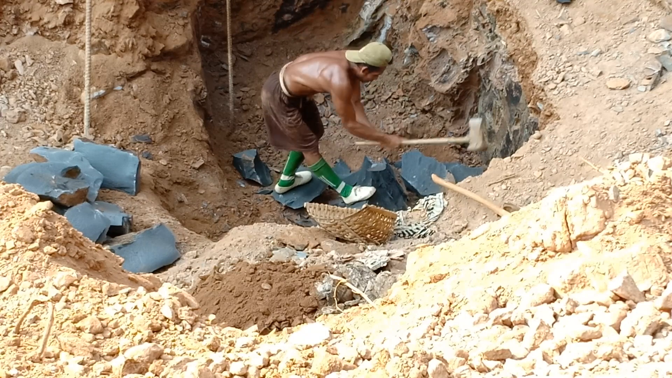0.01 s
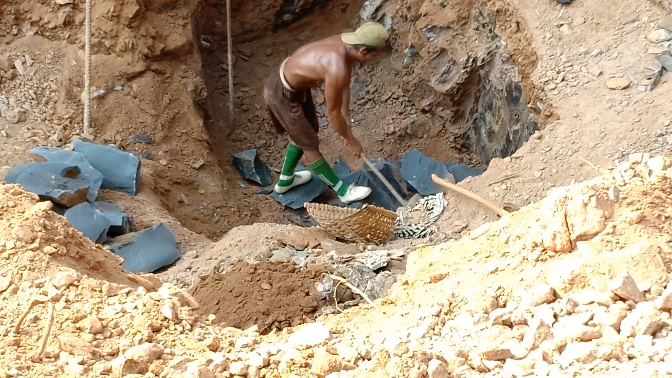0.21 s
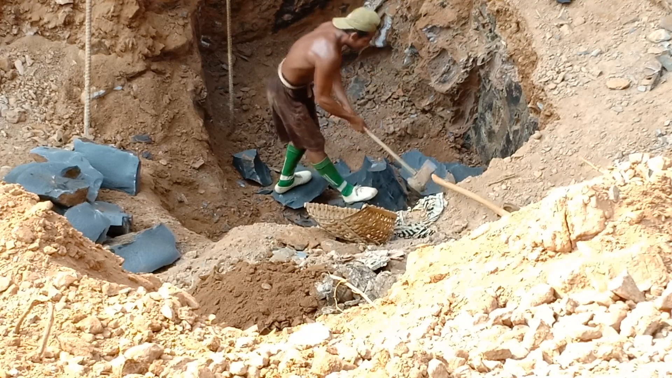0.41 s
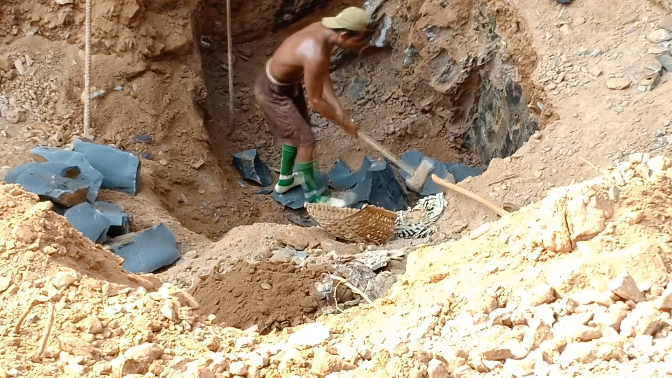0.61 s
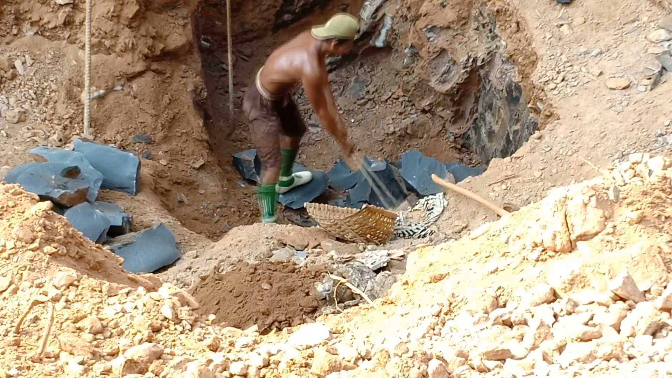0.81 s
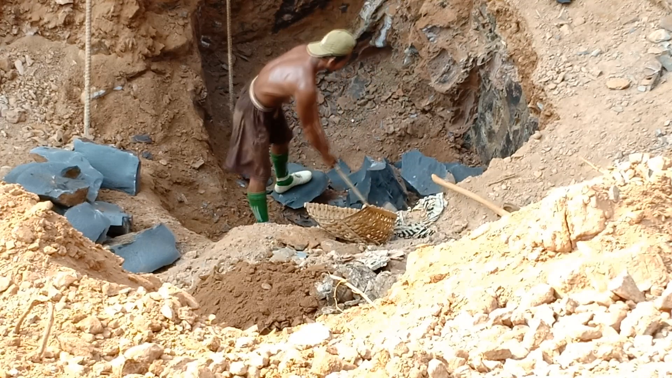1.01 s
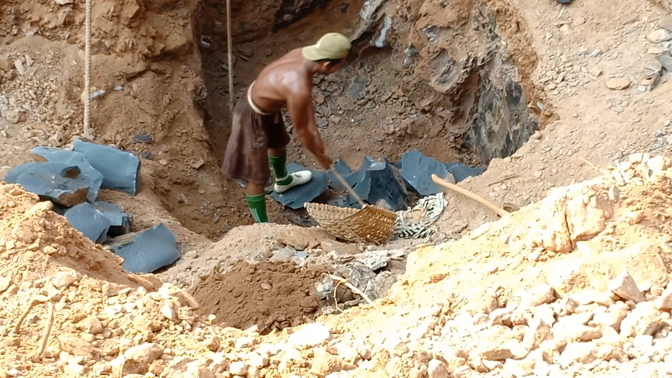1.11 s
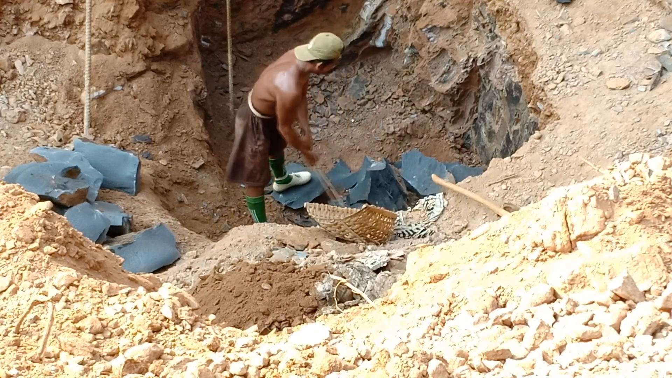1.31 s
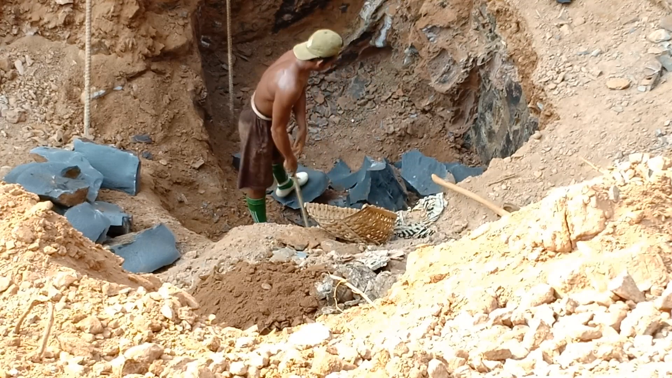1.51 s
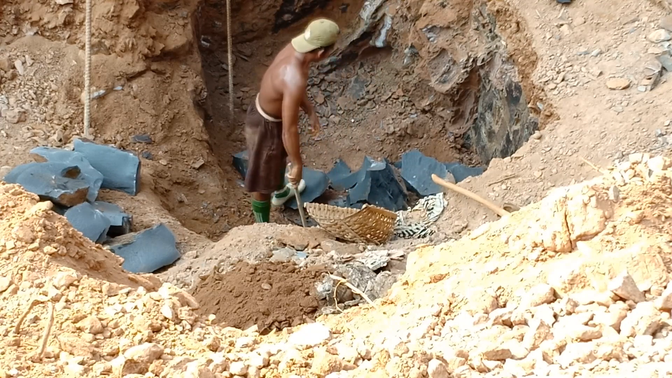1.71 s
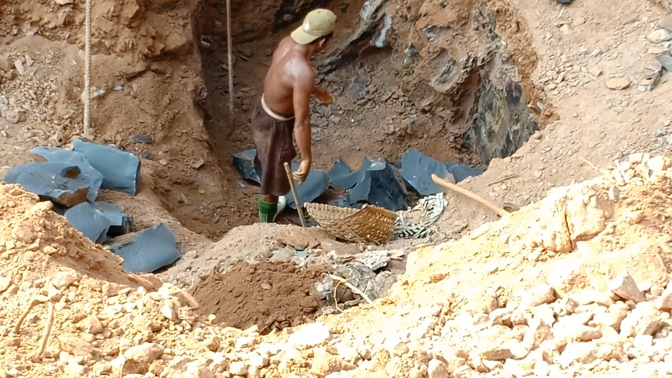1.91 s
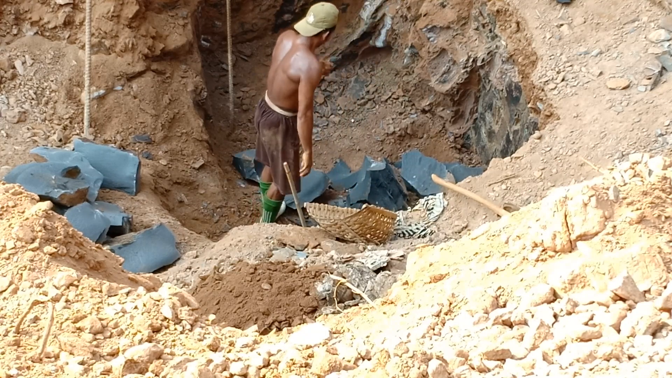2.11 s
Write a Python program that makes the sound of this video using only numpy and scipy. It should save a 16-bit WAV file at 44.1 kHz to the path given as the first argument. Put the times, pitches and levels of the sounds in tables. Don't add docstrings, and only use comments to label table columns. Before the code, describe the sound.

Hammer blow on stone with slumping grit, followed shortly by a rock knock and metallic clink

```python
import sys
import numpy as np
from scipy import signal
from scipy.fft import rfft, irfft, next_fast_len
from scipy.io import wavfile
from scipy.ndimage import map_coordinates

SR = 44100
rng = np.random.default_rng(int(sys.argv[2]) if len(sys.argv) > 2 else 0)


def bounce(signal):
    frames = np.transpose(np.atleast_2d(signal))
    limited = np.clip(frames, -1, 1)
    pcm = np.round(limited * 32767).astype(np.int16)
    wavfile.write(sys.argv[1], SR, pcm)


def field_ratio(decibels):
    return 10 ** (np.asarray(decibels, dtype=float) / 20)


N = 97020

# start in seconds, level in dB, pitch in
# Hz, time to fall 60 dB in seconds.
NOTES = [
    [(.2028, -11, 2700, 0.014), (.2032, -19, 5800, 0.019), (.2052, -18, 5100, .014), (.2146, -11, 1800, 0.016), (.2118, -9, 800, .012), (.2035, -13.5, 1050, 0.027), (.247, -21, 520, .12), (.228, -24, 250, .07), (.213, -26, 200, .06)],
    [(.9216, -13, 810, .045)],
    [(.9483, -5, 5300, .0035), (.9482, -27, 13800, .004), (.9812, -22, 4900, .006), (.9479, -8, 860, .03), (.9592, -12, 870, .035), (.9586, -10.5, 575, 0.032), (0.96, -19, 2500, 0.041), (.958, -20, 1960, 0.044), (.998, -26, 1080, 0.061), (0.95, -36, 540, 0.052), (.949, -20, 1075, .06)],
]


def along(points, hz):
    f, v = np.transpose(points)
    return np.interp(np.log(hz + 1), np.log(f + 1), v)


def unit(x):
    return x / np.sqrt(np.mean(x ** 2) + 1e-20)


def filtered(x, response):
    n = x.shape[-1]
    m = next_fast_len(n + 8192)
    return irfft(rfft(x, m) * response(np.fft.rfftfreq(m, 1 / SR)), m)[..., :n]


def coloured(x, points):
    return unit(filtered(x, lambda hz: field_ratio(along(points, hz))))


def noise(points, size):
    return coloured(rng.standard_normal(size), points)


def wobble(rate, size=N):
    knots = rng.standard_normal(int(size * rate / SR) + 4)
    return map_coordinates(knots, [np.arange(size) * rate / SR], order=1)


def add(track, s, sound):
    part = track[round(s * SR):][:len(sound)]
    part += sound[:len(part)]


def ring(hz, db, t60, t):
    return field_ratio(db - 60 * t / t60) * np.sin(2 * np.pi * hz * t)


def spread(pair, gain=lambda hz: 1):
    # frequency in Hz, likeness of left and right from 0 to 1.
    likeness = [(60, 0.96), (300, 0.86), (600, .6), (1300, 0), (3770, 0.15), (15000, 0.062)]

    def mid_and_side(hz):
        turn = np.arccos(np.clip(along(likeness, hz), -1, 1)) / 2
        return gain(hz) * np.array([np.cos(turn), np.sin(turn)])

    mid, side = filtered(pair, mid_and_side)
    return np.array([mid + side, mid - side])


def body(contacts, modes, crack_colour, crack_t60, crack_db, notes):
    out, t = np.zeros(N), np.arange(SR // 3) / SR
    for s, db, bite_db in contacts:
        tones = np.zeros(len(t))
        for hz, level, t60 in modes:
            flicker_db = 5.5 * wobble(60, size=len(t)) * (1 - np.exp(-t / 0.03))
            shiver_s = np.cumsum(wobble(80, size=len(t))) * 75 * np.sqrt(1 / hz / 1e4) / SR
            tones += ring(hz, level + flicker_db, t60, t + shiver_s)
        crack = field_ratio(crack_db + bite_db - 60 * t / crack_t60) * noise(crack_colour, len(t))
        onset = 1 - np.exp(-t / 0.00021)
        add(out, s, field_ratio(db) * (tones + crack) * onset)
    for s, db, hz, t60 in notes:
        onset = 1 - np.exp(-t * hz / 0.58)
        add(out, s, ring(hz, db, t60, t) * onset)
    return out


def slab_blow():
    # start in seconds, level in dB, crack over its usual level in dB.
    contacts = [(0.2029, -14.5, -0.5), (.204, -13, 0.5), (0.2064, -18, -0.5), (0.2085, -13, -2),
                (0.2121, -8, -3.5), (0.2148, -14.5, -5.5), (0.2236, -25.5, -4.5), (0.23, -28, -7.5)]
    # pitch in Hz, level in dB, time to fall 60 dB in seconds.
    modes = [(321, -15.5, 0.062), (588, -4.5, 0.034), (861.4, -6, 0.026), (250, -21, 0.044),
             (1049, -8, .03), (1926, -7.5, 0.025), (1400, -9.5, 0.02), (4340, -15, 0.034),
             (5000, -22.5, .03), (5730, -17, 0.039), (6400, -23, 0.02), (4356, -40.5, 0.48),
             (5652, -40.5, .37), (6610, -44, 0.28)]
    # frequency in Hz, crack level in dB per Hz.
    crack_colour = [(50, -39), (250, -10.5), (650, -3), (2500, -7), (3500, -21), (4400, -13), (6400, -19),
                    (8500, -37)]
    return body(contacts, modes, crack_colour, crack_t60=0.025, crack_db=2.5, notes=NOTES[0])


def block_knock():
    # start in seconds, level in dB, crack over its usual level in dB.
    contacts = [(.9215, -16, -7.5), (0.9249, -15.5, 1.5), (.9268, -19.5, 3.5), (.9345, -25, -4)]
    # pitch in Hz, level in dB, time to fall 60 dB in seconds.
    modes = [(795, -7, 0.0284), (1063, -14, 0.015), (1948, -6, 0.0097), (4450, -26, 0.039),
             (5800, -32, 0.047)]
    # frequency in Hz, crack level in dB per Hz.
    crack_colour = [(50, -29), (300, -9), (820, -0.5), (2200, -10), (3500, -25), (6000, -23.5),
                    (8500, -36.5), (15500, -39)]
    return body(contacts, modes, crack_colour, crack_t60=0.047, crack_db=-11.5, notes=NOTES[1])


def head_clink():
    # start in seconds, level in dB, crack over its usual level in dB.
    contacts = [(0.948, -12.5, 1.5), (0.9593, -14, -4.5), (0.963, -21.5, -3), (0.9805, -27, 5.5)]
    # pitch in Hz, level in dB, time to fall 60 dB in seconds.
    modes = [(588.6, -8, 0.021), (864, -6.5, 0.023), (1053, -8.5, 0.06), (1994, -8.5, 0.062),
             (6060, -22.5, 0.33), (6140, -20.5, 0.15), (10120, -32.5, 0.26), (10140, -29.5, 0.05),
             (11350, -35.5, .2), (12160, -33, .17), (12500, -45, 0.21), (13500, -37, .2),
             (14050, -51, 0.28), (14670, -41, 0.27)]
    # frequency in Hz, crack level in dB per Hz.
    crack_colour = [(50, -9.5), (300, -18.5), (860, -6.5), (2200, -9.5), (3500, -14.5), (6500, -19.5),
                    (8000, -47.5), (15500, -44)]
    return body(contacts, modes, crack_colour, crack_t60=0.025, crack_db=0, notes=NOTES[2])


def grit():
    # start in seconds, level in dB, rise in seconds, time to fall 60 dB in seconds.
    slumps = [
        (.243, -17, 0.015, 0.22),
        (.968, -28, 0.008, 0.36),
    ]
    # frequency in Hz, level in dB.
    grit_colour = [(200, -11.5), (530, 0.5), (2400, -11.5), (3400, -24), (4400, -17), (6500, -19.5),
                   (8000, -42.5), (15500, -48)]
    # frequency in Hz, level in dB.
    dust_colour = [(50, -37), (300, -11.5), (600, -2.5), (2200, -1.5), (3500, -10), (6500, -11),
                   (8500, -27.5), (15500, -39)]
    grains_per_s, uneven_db = 22000, 1.2
    out, t = np.zeros((2, N)), np.arange(SR // 2) / SR
    for (s, db, rise, t60), colour in zip(slumps, (grit_colour, dust_colour)):
        swell = field_ratio(db - 60 * t / t60) * (1 - np.exp(-(t / rise) ** 2))
        for side in out:
            hits = rng.random(len(t)) < grains_per_s / SR
            sizes = rng.standard_normal(len(t)) * field_ratio(uneven_db * rng.exponential(size=len(t)))
            add(side, s, swell * coloured(hits * sizes, colour))
    return spread(out)


def chips():
    # start in seconds, level in dB, pitch in Hz, time to fall 60 dB in seconds.
    falls = [(0.376, -57, 15000, 0.042), (0.406, -44.5, 1950, 0.021), (.5320, -45.5, 6206, 0.016),
             (0.5329, -48.5, 4088, 0.016), (0.537, -46, 6243, 0.015), (0.5365, -49, 2515, 0.014),
             (0.543, -48.5, 6400, 0.0088), (.6630, -59.5, 5800, 0.029), (1.539, -49, 1850, 0.032),
             (1.5389, -53, 2950, 0.019), (1.5387, -63, 4170, 0.014), (1.546, -62, 5700, 0.029),
             (1.5461, -45, 2000, 0.03), (1.5503, -54, 1496, 0.022), (1.545, -55, 2500, 0.04),
             (1.9450, -65.5, 4500, 0.019)]
    out, t = np.zeros(N), np.arange(SR // 5) / SR
    width, tick_db = 0.061, -11
    for s, db, hz, t60 in falls:
        low, high = hz * (1 - 3 * width), hz * (1 + 3 * width)
        ping = noise([(low, -20), (hz, 0), (high, -20), (hz * 2, -50)], len(t))
        tick_colour = [(hz / 5, -14), (hz / 2, 0), (hz * 0.78, -3), (hz * 1.27, -14), (hz * 3, -34)]
        tick = noise(tick_colour, len(t))
        add(out, s, field_ratio(db - 1.5 - 60 * t / t60) * ping + field_ratio(db + tick_db - 60 * t / 0.026) * tick)
    return out


def thuds():
    # start in seconds, level in dB, pitch in Hz, time to fall 60 dB in seconds.
    hits = [(.212, -23, 115, .1), (.222, -31, 62, .08), (.268, -31, 95, .11), (.924, -35, 150, .07),
            (.957, -30, 72, .12), (.953, -24, 118, .12), (1.538, -47, 130, .15), (1.54, -51, 210, .08),
            (.125, -49, 185, .3), (.125, -56, 460, .15), (.04, -55, 420, .15), (.82, -52, 220, .1),
            (2.182, -55, 400, .06), (1.41, -52, 140, .12), (1.545, -53, 75, .2)]
    out, t = np.zeros(N), np.arange(SR // 5) / SR
    for s, db, hz, t60 in hits:
        add(out, s, ring(hz, db, t60, t) * (1 - np.exp(-t / 0.0026)))
    return out


def pit(x):
    # frequency in Hz, time for the wash to fall 60 dB in seconds.
    wash_t60 = [(100, 0.36), (500, 0.55), (2000, 0.67), (6000, 0.82), (14000, 0.97)]
    # frequency in Hz, level of the wash in dB.
    wash_colour = [(60, -2), (550, 0.5), (830, -4.5), (1200, -2), (2000, 0.5), (6000, -2), (8500, -3.5),
                   (15000, -3.5)]
    hz, t, z = signal.stft(rng.standard_normal((2, SR * 3 // 4)), SR, nperseg=256)
    fade_db = along(wash_colour, hz)[:, None] - 60 * t / along(wash_t60, hz)[:, None]
    wash = signal.istft(z * field_ratio(fade_db), SR, nperseg=256)[1]
    t = np.arange(wash.shape[1]) / SR
    delay_s, rise_s = 0.0071, 0.013
    wash = wash * (1 - np.exp(-np.clip(t - delay_s, 0, None) / rise_s))
    echoes = rng.standard_normal((2, len(t))) * (rng.random(len(t)) < 0.03)
    near = echoes * field_ratio(-60 * t / 0.081)
    walls = field_ratio(-16) * wash / np.linalg.norm(wash[0]) + field_ratio(-9) * near / np.linalg.norm(near[0])
    return signal.fftconvolve(x[None], walls, axes=1)[:, :N]


def wide_noise(points):
    return unit(spread(rng.standard_normal((2, N)), lambda hz: field_ratio(along(points, hz))))


def breeze():
    # time in seconds, strength in dB.
    strength = [(0.0, -59), (0.13, -55.5), (0.3, -57), (0.46, -54.5), (0.621, -62), (0.829, -63),
                (1.02, -59.5), (1.21, -60.5), (1.49, -61.5), (1.74, -65.5), (2.2, -62.5)]
    # frequency in Hz, level in dB per Hz.
    puff_colour = [(18, -70), (30, -33.5), (59, -18.5), (86, -1.5), (161, -10.5), (215, -8), (600, -16.5),
                   (780, -46), (1320, -120)]
    s, db = np.transpose(strength)
    puff_db = np.interp(np.arange(N) / SR, s, db + 1.5)
    return field_ratio(puff_db + 1.5 * wobble(7.4)) * wide_noise(puff_colour)


def hiss():
    # frequency in Hz, level in dB per Hz.
    hiss_colour = [(290, -35.5), (520, -3), (830, -3), (1150, -10), (2100, -4.5), (3600, -17.5),
                   (5800, -19), (8500, -27.5)]
    fade_db = 1.08 * (np.arange(N) - N / 2) / SR
    return field_ratio(-66 + 3.0 + 0.61 * wobble(1.9) - fade_db) * wide_noise(hiss_colour)


def arrive(x, right_leads_s):
    sides = np.array([[-1], [1]])
    return filtered(np.array([x, x]), lambda hz: np.exp(1j * np.pi * hz * right_leads_s * sides))


def scene():
    sources = [slab_blow(), block_knock(), head_clink(), chips() + thuds()]
    right_leads_s = (-0.00002, -0.00002, 0.00021, -0.00001)
    direct = sum(arrive(x, lead) for x, lead in zip(sources, right_leads_s))
    echoes = spread(sum(pit(x) for x in sources))
    return direct + echoes + grit() + breeze() + hiss()


def top_cut(x):
    return signal.sosfilt(signal.butter(12, 17040, fs=SR, output="sos"), x)


def record(dry):
    # frequency in Hz, left over right in dB.
    left_over_right = [(3000, 0), (4600, -3), (5500, -2), (6100, 9), (6900, 2), (9000, 1.5)]

    def microphone(hz):
        low_cut = (1j * hz / (45 + 1j * hz)) ** 3
        top = 0.092 / (1 + (hz / 16500) ** 80) + 1 / (1 + (hz / 15300) ** 80)
        return low_cut * top * field_ratio(along(left_over_right, hz) * np.array([[0.5], [-0.5]]))

    rumble = field_ratio(-79.5) * noise([(25, -11.5), (50, 1.0), (70, -28.5), (200, -80.5)], N)
    offset = 0.001
    return top_cut(filtered(dry, microphone) + offset + rumble)


dry = scene()
out = record(dry)
bounce(out)
```